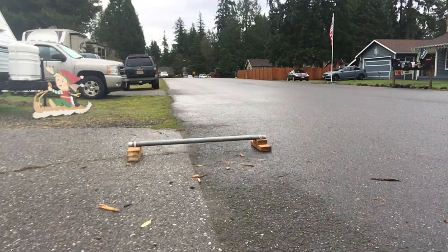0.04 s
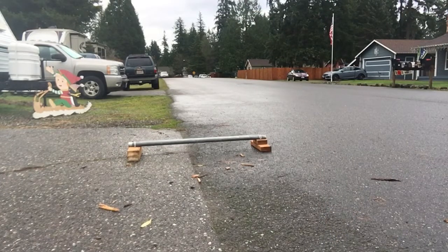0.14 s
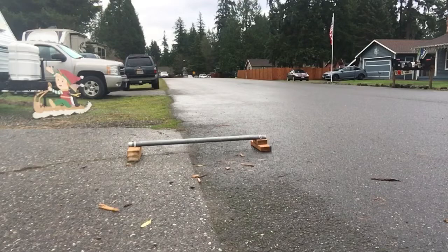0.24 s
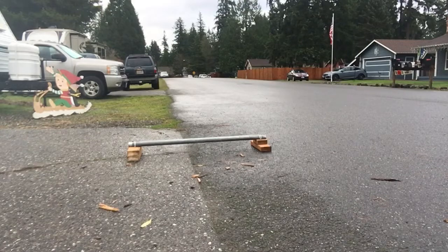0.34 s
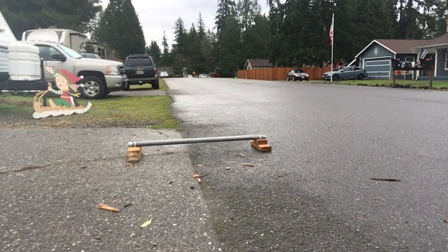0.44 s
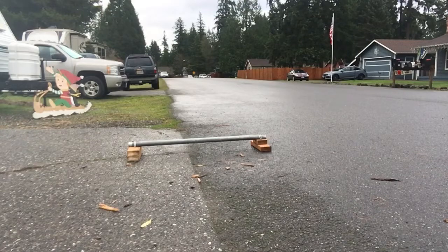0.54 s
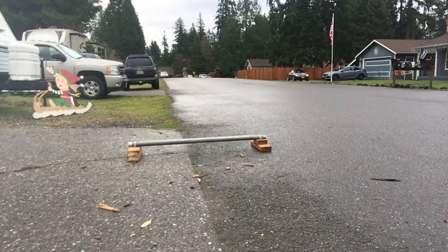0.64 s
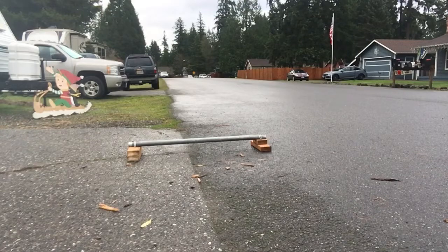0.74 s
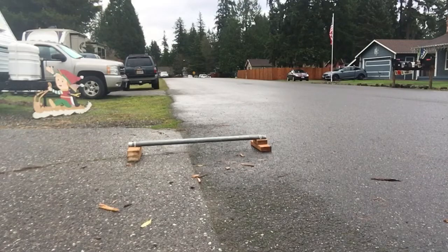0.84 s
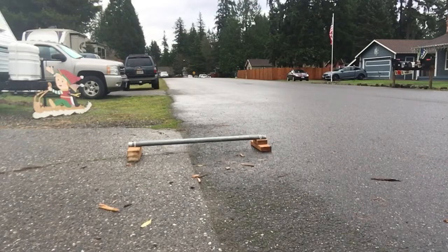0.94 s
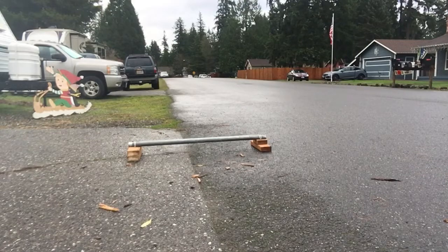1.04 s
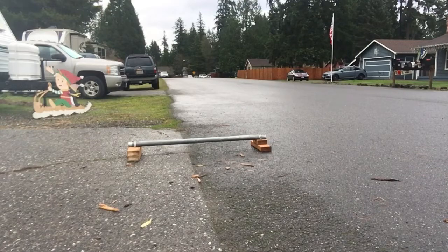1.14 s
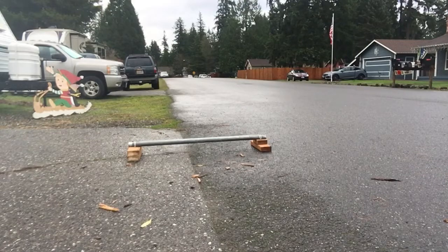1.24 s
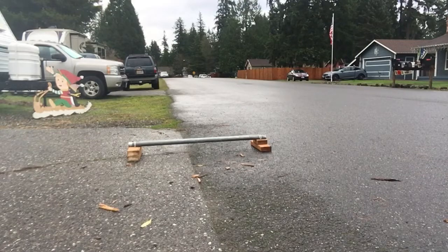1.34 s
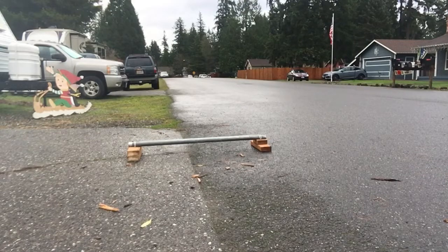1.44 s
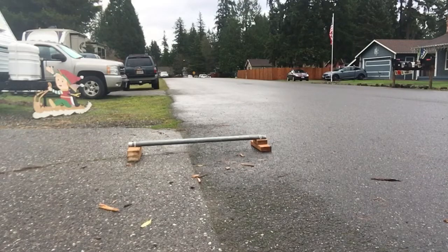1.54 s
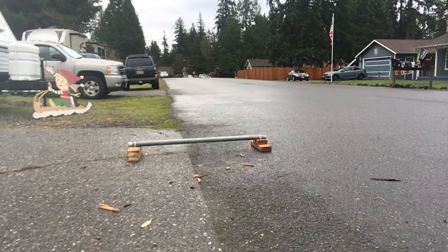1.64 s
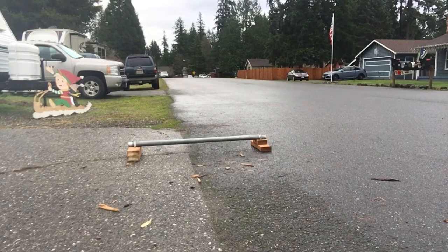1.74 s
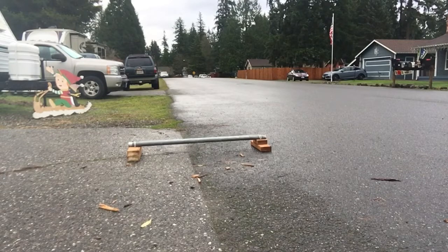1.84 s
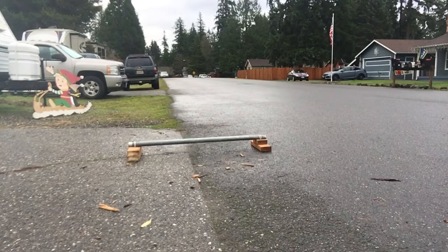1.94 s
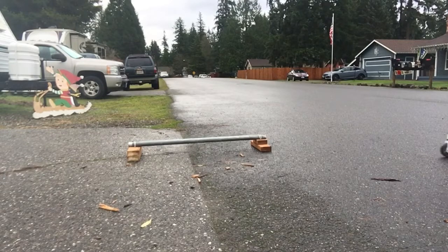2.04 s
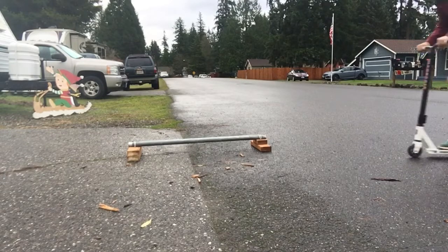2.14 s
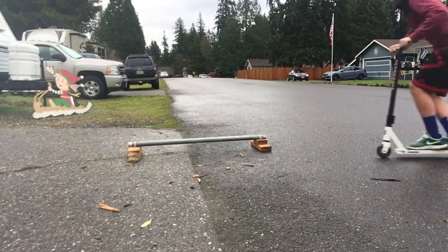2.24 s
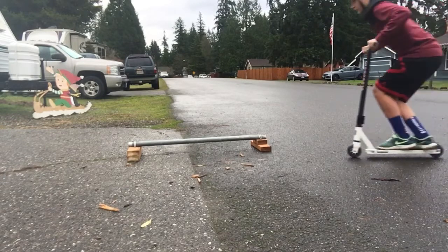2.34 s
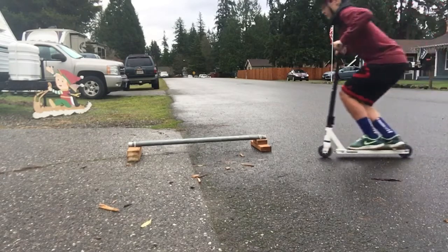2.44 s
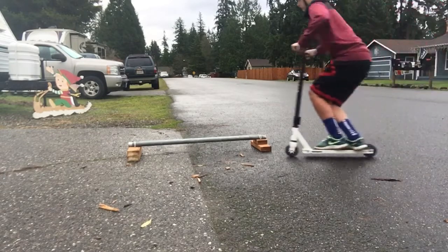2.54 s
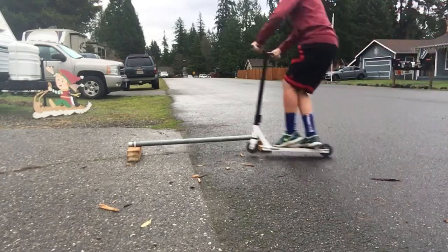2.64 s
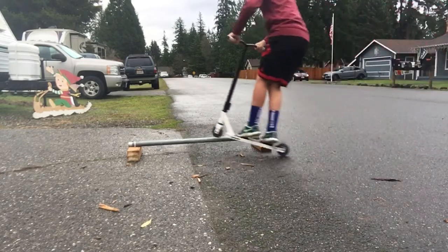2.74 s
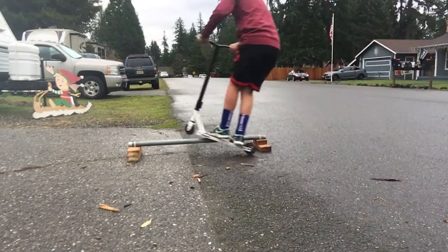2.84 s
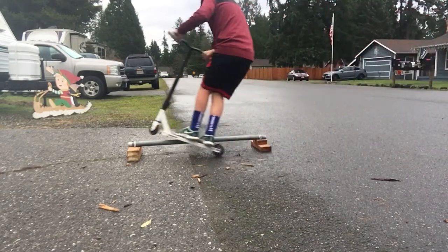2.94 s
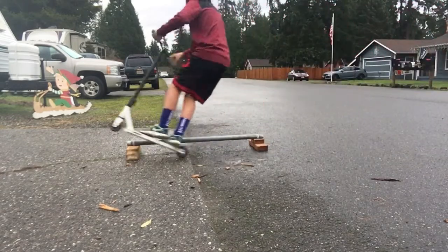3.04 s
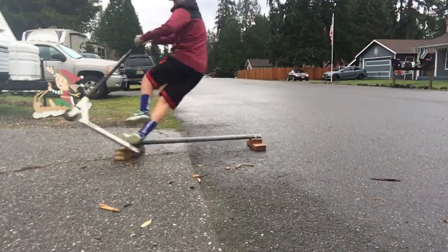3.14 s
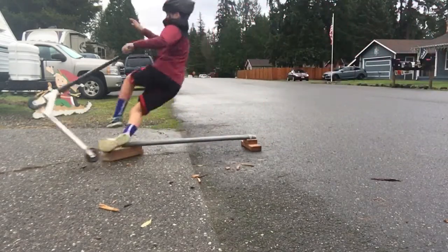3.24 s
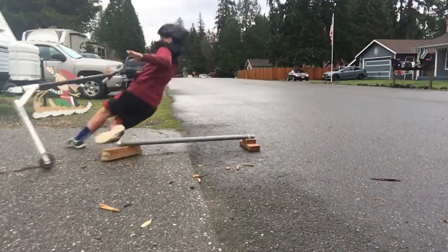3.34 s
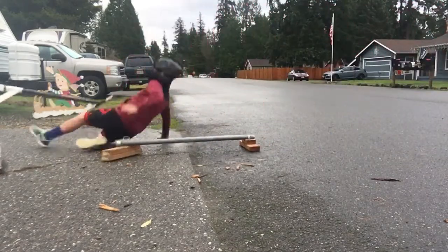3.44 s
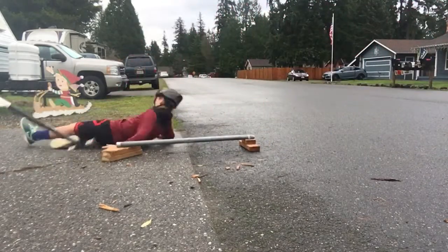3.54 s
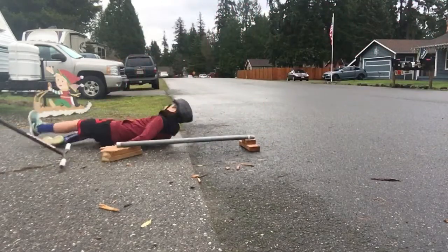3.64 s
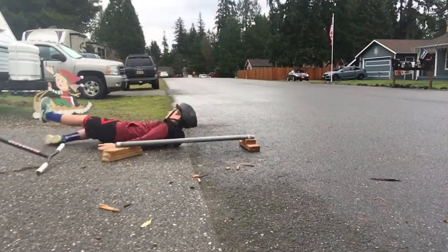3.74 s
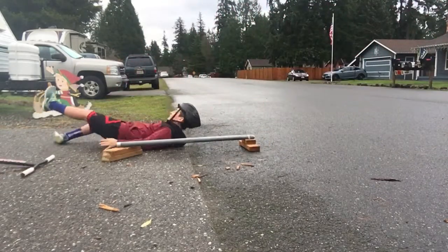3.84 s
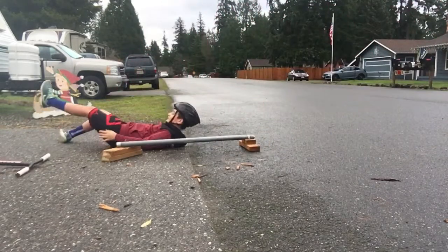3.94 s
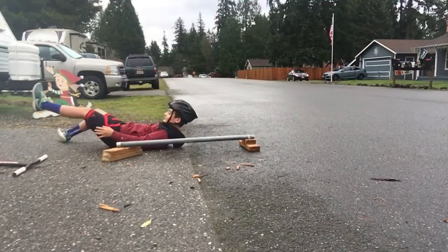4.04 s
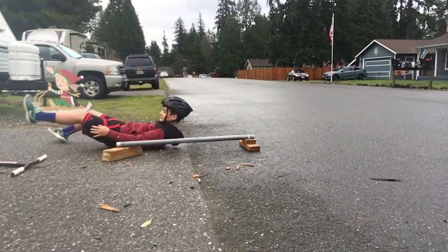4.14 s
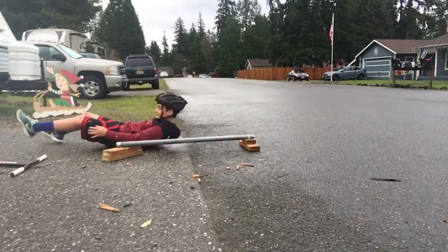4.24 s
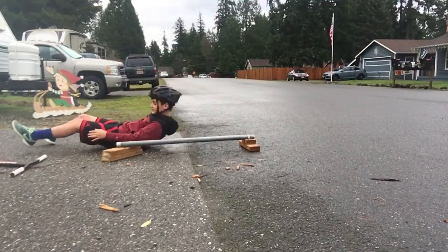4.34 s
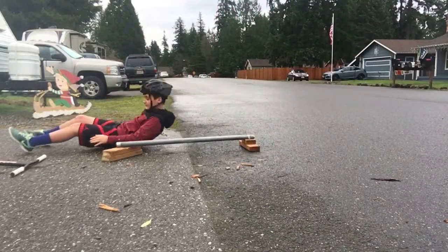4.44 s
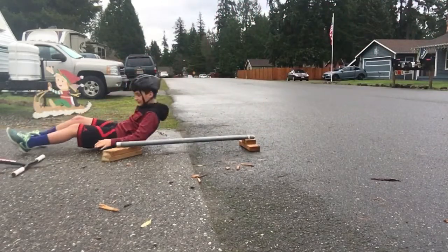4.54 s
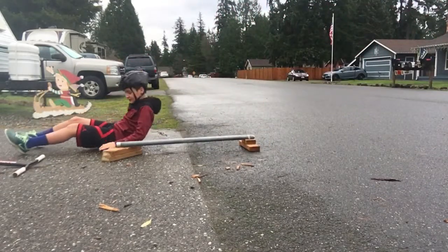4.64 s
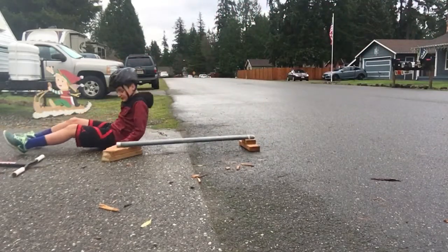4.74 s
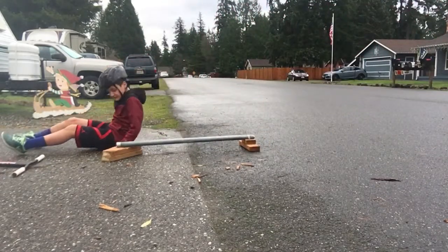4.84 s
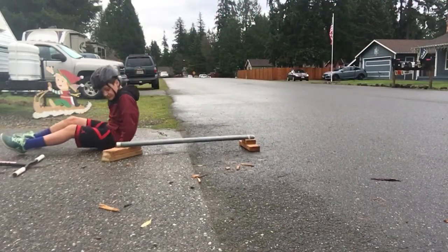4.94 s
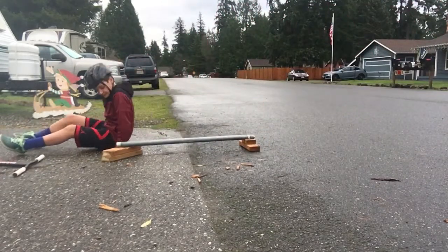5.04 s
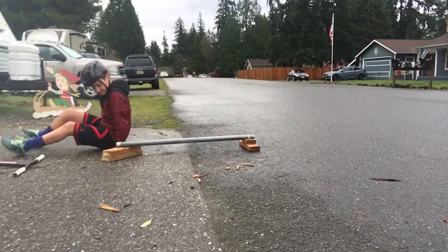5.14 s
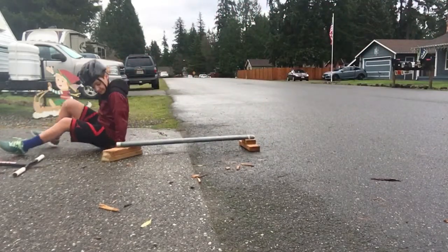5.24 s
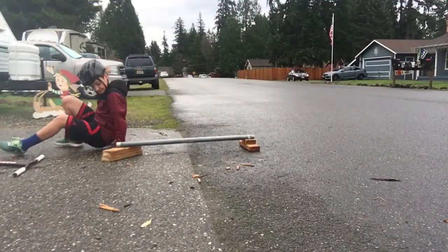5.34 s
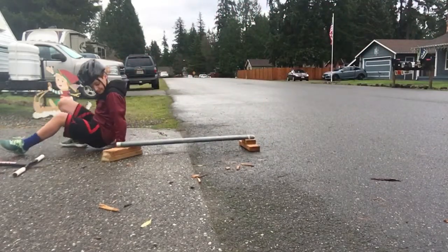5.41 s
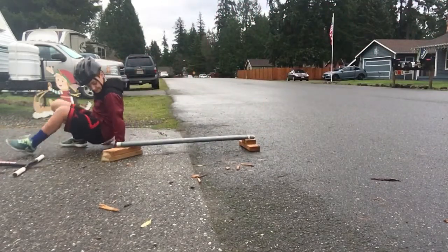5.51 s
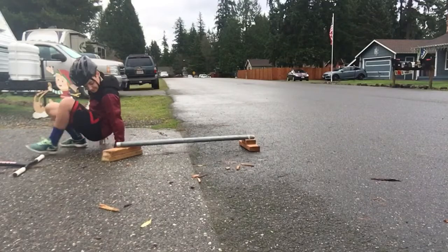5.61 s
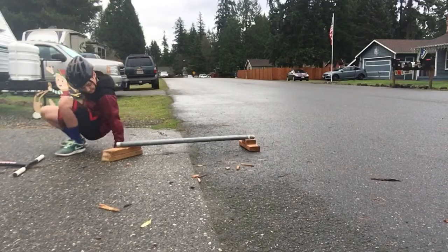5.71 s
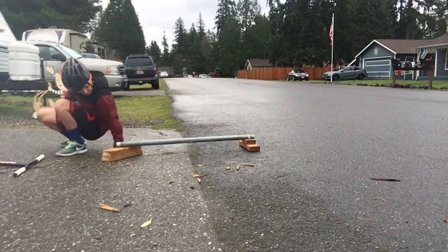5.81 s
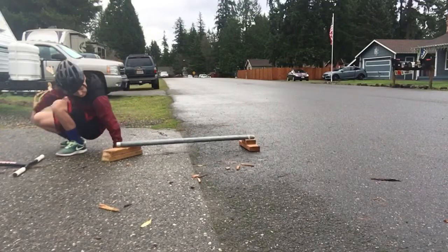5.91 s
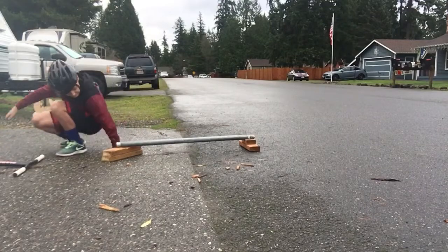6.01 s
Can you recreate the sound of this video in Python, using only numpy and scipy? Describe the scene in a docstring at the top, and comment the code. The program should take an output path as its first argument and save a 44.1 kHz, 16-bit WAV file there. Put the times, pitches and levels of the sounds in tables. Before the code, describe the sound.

A kick scooter rolls up a damp street, knocks and scrapes a steel pipe, then crashes and clatters over asphalt as its rider thuds down.

```python
"""Over distant traffic and far birds, a kick scooter rolls up a damp residential street and nears the microphone:
grainy wheel noise, filtered spray, small scuffs and one squeak. It hops onto a low steel pipe on wooden blocks,
where bursts of noise and decaying modes knock and ring, and rough noise scrapes. It slips off, the rider tumbles
in soft thuds, and the scooter cartwheels over the asphalt with its frame ringing and loose parts rattling. Cloth
and shoes scuff as the rider gets up. House fronts return smeared echoes of all the near sounds."""
import sys
import numpy as np
from scipy import signal
from scipy.fft import rfft, irfft
from scipy.io import wavfile
from scipy.ndimage import uniform_filter1d

SR = 44100
rng = np.random.default_rng(int(sys.argv[2]) if len(sys.argv) > 2 else 0)


def inscribe(sig):
    """Save sig as 16-bit PCM at rate SR to the path in sys.argv[1].

    A 1-D sig is mono; a 2-D sig holds one channel per row.
    Samples are clipped to [-1, 1] before scaling.
    """
    pcm = np.round(np.clip(np.atleast_2d(sig).T, -1, 1) * 32767)
    wavfile.write(sys.argv[1], SR, pcm.astype(np.int16))


N = 267687
T = np.arange(N) / SR
HIT_T = T[:int(.6 * SR)]

# Levels are relative dB wherever a function adds its own gain.
# Distant traffic, relative spectrum: pitch_hz, level_db
TRAFFIC_COLOUR = [(15, -67), (25, -26), (42, -14.5), (53, 5), (87, -6.5), (200, -3.5), (263, -3), (335, -6),
                  (503, -11.5), (641, -7), (1070, -9.5), (2220, -29), (3920, -39.5), (5000, -40.5),
                  (16000, -58)]
# Distant engines droning: pitch_hz, width_hz, level_db
DRONES = [(61.4, 5.7, -63), (197, 360, -67), (328, 4.2, -64.5)]
# Wheels on the road and flicked-up spray, relative spectra: pitch_hz, level_db
ROAD_COLOUR = [(50, -16.0), (200, 10.5), (400, 0.0), (680, -5.5), (900, -3.0), (1150, -16.5), (1600, -7.0),
               (4000, -41.5)]
SPRAY_COLOUR = [(600, -18.5), (2000, 3.5), (4000, 0.5), (7000, -7.0), (10000, -12.0), (15000, -7.5)]
# House fronts and parked cars: delay_s, level_db
WALLS = [(0.037, -16), (.088, -25.5), (.106, -25), (.14, -34.5), (.198, -33.5)]
# Tint of the street echo: pitch_hz, level_db
ECHO_COLOUR = [(80, -16), (250, 1), (600, 0.5), (1200, -5.5), (1900, 0), (2300, -4.5), (4000, 0.5),
               (8000, -14), (16000, -15)]
# Far birds, one slurred note each: start_s, start_pitch_hz, end_pitch_hz, level_db
BIRD_CALLS = [(.43, 3540, 4800, -71.5), (.625, 6000, 5140, -80), (.68, 4500, 3240, -76),
              (1.03, 3700, 4740, -75), (1.2, 3800, 5200, -80), (1.29, 4400, 4180, -79),
              (1.4, 3420, 4300, -78), (1.505, 3480, 4420, -74), (1.965, 4640, 3630, -73),
              (5.859, 4080, 3500, -78.5)]
# Small birds twittering in the trees: start_s, end_s, centre_hz, level_db
TWITTERS = [(0, .55, 6960, -82.5), (0, 0.398, 4600, -88), (0.803, 0.883, 7600, -83),
            (0.997, 1.601, 5220, -85), (5.75, 5.98, 5220, -87)]
# Soles, wet tyres and handlebar scuffing the asphalt: start_s, rise_s, level_db, centre_hz
SCUFFS = [(0.882, 0.0091, -54.5, 3000), (1.574, 0.0048, -54, 2880), (3.041, 0.011, -42, 9930),
          (3.176, 0.0049, -50.5, 4480), (3.236, 0.019, -48, 13000), (3.353, 0.0036, -34.5, 4650),
          (3.423, 0.018, -42.5, 2900), (4.334, 0.0055, -42, 1000), (4.447, 0.0068, -41.5, 2900),
          (4.556, 0.0068, -45, 1210), (4.83, 0.011, -43, 1290), (5.265, 0.01, -55, 3210),
          (5.494, 0.0046, -48.5, 3300), (5.542, 0.0028, -48.5, 2500), (5.61, 0.0087, -49, 2500)]
# Stones cracking under wheels, deck and shoes: start_s, level_db, hardness_db (treble tilt), pitch_hz
GRIT = [(1.657, -57, 27, 8000), (1.771, -54, 22, 9000), (1.9524, -43.5, 17, 3800),
        (2.047, -47.5, 23.5, 7000), (2.487, -52, 14, 1500), (2.9624, -18.5, 13.5, 8960),
        (3.274, -17.5, 0.5, 5000), (3.3262, -24.5, 1, 3000), (3.342, -28, 7, 6500),
        (3.363, -11, -0.5, 2400), (3.374, -30.5, -1, 2400), (3.437, -15, 3, 3000), (3.451, -28, 6, 4000),
        (5.489, -41, 3.5, 4000), (5.5177, -40, -5, 4200)]
# Deck and wheels striking the pipe, and once (3.325 s) a knock on its wooden blocks: start_s, level_db, bass_db
# and treble_db against the level, resonance_hz, # chatter_t60_s, rebound_db and ring_db against the level,
# favoured_hz (modes the contact point favours)
PIPE_HITS = [(2.7525, -10, -37.5, -9.5, 1404, 0.05, -2, -29.5, 7200),
             (2.8645, -19.5, -13.5, -10.5, 900, 0.053, -5.5, -30, 1030),
             (2.941, -31, -12, -7.5, 705, .05, -5.5, -35, 541),
             (3.201, -23.5, -28, -5.5, 1800, .05, -6.5, -27, 2395),
             (3.238, -24, -2.5, -9.5, 1400, 0.083, -2.5, -26.5, 7200),
             (3.2625, -23.5, -13.5, -13, 1320, .035, -8.5, -29, 1265),
             (3.325, -22, -8.5, -17, 560, 0.037, -4.5, -32, 541),
             (3.392, -31.5, -5, -12.5, 900, 0.036, -6, -28.5, 7200),
             (3.418, -29.5, -14.5, -10, 1400, 0.14, -2.5, -31.5, 1265)]
# The scooter striking the ground: same columns
FRAME_HITS = [(3.018, -26, -3.5, -6.5, 500, .06, -14.5, -33.5, 551),
              (3.0224, -17.5, -3, -2.5, 542, 0.11, -16, -34, 550),
              (3.4707, -17.5, -9.5, -3.5, 830, 0.073, -6, -25.5, 547),
              (3.4756, -14.5, -13.5, -7.5, 800, .12, -3, -26.5, 678),
              (3.491, -9, -9, -0.5, 1650, 0.1, -11.5, -23.5, 6750),
              (3.502, -15.5, 0, -14, 584, 0.13, -4, -20, 330),
              (3.627, -30, -7, -22, 700, .05, -12, -29, 1535),
              (3.663, -33.5, -15.5, -8, 1250, .04, -7, -25, 1230),
              (3.686, -31, -10, -17, 950, .04, -9, -25, 678),
              (3.711, -28, -16, -15, 1240, .03, -7, -26.5, 1243),
              (3.725, -20.5, -4, -2, 1114, 0.14, -7.5, -24, 1243),
              (3.7645, -20.5, -24, -27, 1100, 0.026, -14.5, -36, 1075),
              (3.7729, -3.5, -20, -6, 1490, 0.076, -11, -50, 1720),
              (3.877, -20.5, -11, -19, 920, 0.043, -6, -30, 1980),
              (3.912, -27, -9, -16, 1900, 0.05, -5, -28, 2728),
              (3.933, -28, -9, -24, 890, .04, -10.5, -27, 942),
              (3.972, -29.5, -12, -27, 1100, 0.056, -8.5, -23.5, 1920),
              (4.089, -37.5, -12, -17, 1013, 0.045, -7, -25.5, 1965),
              (4.3415, -9, -10, -12, 1200, 0.15, -7, -38, 1243),
              (4.3671, -5, -9, -7.5, 1160, 0.11, -16.5, -33, 1340),
              (4.452, -25, -11, -7, 1410, 0.1, -7, -26, 1480),
              (4.485, -28, -7.5, -22, 520, 0.083, -13, -20, 1260),
              (4.569, -5.5, -18.5, -17, 1060, .035, -10, -33.5, 2660),
              (4.5908, -11.5, -22, -11.5, 1370, 0.13, -7.5, -36, 1690),
              (4.69, -29.5, -3.5, -35, 477, 0.031, -9, -26, 445),
              (4.773, -24.5, -24.5, -14.5, 1590, 0.11, -0.5, -26, 1900),
              (4.8415, -13.5, -11.5, -4, 1180, 0.068, -11, -29.5, 2440),
              (4.854, -21.5, -18, -15, 3480, 0.097, -9, -24.5, 3460),
              (4.886, -23, -14, -19, 1710, 0.087, -2, -29, 1880),
              (4.905, -21.5, -6, -12, 1120, 0.1, -10, -26.5, 2728),
              (4.929, -24, -13, -16, 1790, 0.073, -4, -37, 1720),
              (5.158, -37, -4.5, -15, 1240, 0.064, -4.5, -36.5, 1970),
              (5.19, -24.5, -8.5, -17, 1560, 0.12, -3, -28.5, 2780),
              (5.213, -34, -13.5, -6.5, 1690, 0.037, -10, -34, 1865)]
# Resonances of the steel pipe, then of the scooter frame: pitch_hz, level_db, t60_s
PIPE_MODES = [(541, 2, .15), (705, -1, .22), (1030, 0, .08), (1265, -4, .25), (1687, -5, .12),
              (2603, 6.5, .41), (2628, 0, .3), (2700, -1, .16), (3087, -6, .25), (3278, -11, .3),
              (3625, -9, .3), (4065, -10, .22), (4897, -15, .35), (6375, -15, .36), (7170, -7, .3),
              (7295, -11, .2), (7520, -14, .15), (8042, -19, .22), (10040, -23, .22), (13750, -19, .2)]
FRAME_MODES = [(247, -2, .2), (330, -3, .35), (445, -5, .25), (550, -3, .25), (678, -1, .33), (942, 0, .3),
               (1075, -1, .25), (1243, 0, .33), (1420, -3, .25), (1535, 0, .38), (1705, -2, .28),
               (1880, -5, .27), (1965, -7, .3), (2435, -12, .48), (2728, -5.5, .33), (2933, -12, .26),
               (3250, -13, .22), (3465, -8, .22), (3893, -12, .32), (3985, -13, .25), (4450, -17, .22),
               (5370, -19, .25), (5830, -19, .25), (6090, -17, .17), (6650, -15, .28), (7050, -16, .3)]
# Tint of the pipe knocks, frame knocks, and slides and stones: pitch_hz, level_db
PIPE_COLOUR = [(47, -46), (80, -13), (331, -9.5), (515, -4), (1430, -5.5), (1990, -16), (2840, -10.5),
               (3790, -14), (4140, -9), (4420, -18.5), (7360, -19.5), (10500, -40), (16000, -51.5)]
FRAME_COLOUR = [(35, -50.5), (60, -6), (233, -1), (389, -0.5), (732, -2), (946, 3.5), (1580, -2),
                (2000, -2), (2190, -9.5), (2970, -8.5), (4860, -16.5), (6900, -21.5), (10300, -42),
                (12700, -38), (16000, -50.5)]
SLIDE_COLOUR = [(35, -40.5), (60, -19.5), (91, -12), (198, -4), (389, -4.5), (515, -3.5), (1200, 0),
                (1620, -4.5), (2970, -13.5), (6430, -21.5), (8510, -29.5), (13300, -36.5), (16000, -36)]
# Bass, middle, treble and sizzle of a blow: low_hz, high_hz
BLOW_BANDS = [(40, 500), (500, 2500), (2500, 8000), (8000, 17000)]
# The deck grinding along the pipe: start_s, length_s, level_db, rumble_db and hiss_db against the level, bite_db
GRINDS = [(2.76, .06, -46.5, 4.5, 6, -3), (3.202, .03, -49.5, -5.5, 3.2, 2.5),
          (3.27, .02, -40.5, -7.5, 2.4, 8.5)]
# The scooter skidding on the asphalt: same columns
SKIDS = [(2.945, 0.042, -46.5, 4, -3.5, -4.5), (3.024, 0.047, -46.5, -6, 6, -3),
         (3.32, 0.22, -42, -4, 0, -14), (3.49, 0.28, -37, -7, -9, 15.5), (3.774, 0.18, -35.5, -8, -7.5, 11),
         (4.41, 0.17, -38, -14, -12, -10)]
# The rider's feet and body landing: start_s, level_db, resonance_hz
THUMPS = [(2.818, -30, 159), (2.945, -27.5, 210), (2.975, -27.5, 154), (3.025, -18, 175),
          (3.052, -24.5, 245), (3.122, -36.5, 160), (3.219, -27.5, 190.7), (3.2621, -18.5, 165),
          (3.326, -22.5, 230), (3.387, -24, 190), (3.429, -25, 258.4), (3.494, -20.5, 149.8),
          (3.774, -9.5, 254), (4.345, -28.5, 140), (4.367, -25, 270), (4.572, -21.5, 280)]
# Tint of those landings: pitch_hz, level_db
BODY_COLOUR = [(25, -19), (45, -5.5), (90, -3.5), (150, -0.5), (260, 2), (450, -11), (1200, 0), (3000, -27),
               (8000, -32.5), (16000, -46.5)]
# Jacket and shoes dragging as the rider rolls over and gets up, after a spinning wheel's faint spray (the first
# row): middle_s, half_length_s, level_db
RUSTLES = [(4.243, 0.14, -58), (5.204, 0.057, -50.5), (5.499, 0.047, -49), (5.633, 0.028, -52)]
# Tint of those soft dragging strokes: pitch_hz, level_db
CLOTH_COLOUR = [(200, -5.0), (900, 16.5), (3000, -6.0), (7000, -9.5), (10000, -22.0), (15000, -17)]

TRAFFIC_DB, TRAFFIC_FLICKER_DB = -50.5, 1.1
# the run-up: the scooter nears at a steady speed, is pressed down in a crouch, then leaves the ground
SPEED_M_S, NEAREST_M, TAKEOFF_S, LIFT_S = 2.97, 3.13, 2.75, .03
CROUCH_S, CROUCH_WIDTH_S, CROUCH_RUMBLE_DB, CROUCH_SPRAY_DB = 2.485, 0.074, 9, 8
RUMBLE_DB, SPRAY_DB, SPRAY_FLICKER_DB = -52.5, -66, 2.5
DECK_HUM_HZ, DECK_HUM_DB = 870, -51.5
BIRD_NOTE_S = 0.067
TWITTER_NOTE_S, TWITTER_GAP_S, TWITTER_OCTAVES = .04, .04, .13
SQUEAK_S, SQUEAK_LENGTH_S, SQUEAK_START_HZ, SQUEAK_END_HZ = 1.576, .0125, 1530, 3400
SQUEAK_DB, SQUEAK_DB_PER_OCTAVE = -46.5, -10
GRIT_T60_S, GRIT_BASS_DB, GRIT_SIZZLE_DB = 0.014, -16, -25
# BLOW_S sets the loudness of a blow and how soon the next contact damps a ring
BLOW_S = .01
# the first contact of a blow: its t60 and, for a full-scale blow, its height over the chatter
FIRST_CONTACT_S, PUNCH = .022, 2.2
# every blow has a sharper rebound: delay_s, added treble_db
PIPE_REBOUND = (.003, 0.96)
FRAME_REBOUND = (.012, 3)
# how sharply a tube still in contact resonates, and the width that the contact adds
SHELL_Q, SHELL_WIDTH_HZ = 72, 24
FAVOUR_OCTAVES, RING_FLUTTER_DB, CLEAN_T60_S = .2, 2.5, .5
# a slide bites as the weight comes down, sags as it slows (the hiss sooner) and dies away when contact ends
SLIDE_ATTACK_S, BITE_S, SLIDE_RELEASE_T60_S = 0.0056, 0.017, 0.29
SAG_DB_PER_S, HISS_SAG_DB_PER_S = 2.5, 43
# the resonances of a scrape change as the contact point shifts
SHIFT_PER_S, SHIFT_DB = 28, 6
THUMP_T60_S, SLAP_DB = 0.14, -3.5
# loose parts take up a share of every blow on the ground and rattle it away
RATTLE_DB, RATTLE_RISE_S, RATTLE_T60_S = -32, 0.017, 0.39
TOP_HZ = 16000


def undb(db):
    """Decibels to gain."""
    return 10 ** (np.asarray(db) / 20)


def unit(x):
    """Scale to rms 1."""
    return x / np.sqrt(np.mean(x ** 2))


def band(x, lo_hz, hi_hz):
    """Band-pass."""
    edges = [lo_hz, min(hi_hz, .48 * SR)]
    return signal.sosfilt(signal.butter(N=3, Wn=edges, btype="band", fs=SR, output="sos"), x)


def colour(x, points, size=2048):
    """Causal minimum-phase filter that follows a spectrum of (Hz, dB) points."""
    hz, db = np.transpose(points)
    bins_hz = np.fft.rfftfreq(size, 1 / SR)
    gain = undb(np.interp(np.log(bins_hz + 1), np.log(hz), db))
    # folding the cepstrum forward puts the energy at the start
    cepstrum = irfft(np.log(gain))
    cepstrum[1:size // 2] *= 2
    cepstrum[size // 2 + 1:] = 0
    return signal.fftconvolve(x, irfft(np.exp(rfft(cepstrum))))[:len(x)]


def fade(t, t60):
    """Exponential decay, 60 dB down at t60."""
    return np.exp(-np.log(1000) * t / max(t60, 1e-3))


def since(s):
    """Seconds gone by since time s, zero before it."""
    return np.maximum(T - s, 0)


def swell(s, width_s):
    """A smooth rise and fall that reaches 1 at time s."""
    return np.exp(-((T - s) / width_s) ** 2)


def walk(rate):
    """Smoothed random wander over the whole scene, rms 1."""
    k = int(SR / rate)
    steps = np.repeat(rng.standard_normal(N // k + 1), k)
    return unit(uniform_filter1d(steps, k)[:N])


def wander(n, rate):
    """Random values joined by straight lines, rate of them a second."""
    points = rng.standard_normal(int(n * rate / SR) + 2)
    return np.interp(np.arange(n) * rate / SR, np.arange(len(points)), points)


def grains(n, spread_db):
    """Dense micro-impacts; a wider spread lets single ones stand out."""
    size_db = spread_db * np.minimum(rng.exponential(size=n), 6)
    return unit(rng.standard_normal(n) * undb(size_db))


def resonate(x, hz, q):
    """One damped resonance, gain 1 at its centre."""
    return signal.lfilter(*signal.iirpeak(hz, max(q, 1), fs=SR), x)


def add(out, s, x):
    """Mix x into out at time s."""
    i = int(s * SR)
    out[i:i + len(x)] += x[:N - i]


def neighbourhood(flicker_db):
    """Distant traffic, noise that wavers band by band, and engines droning as narrow bands of noise."""
    edges = np.geomspace(20, 20000, num=11)
    air = 0
    for lo, hi in zip(edges, edges[1:]):
        air = air + band(rng.standard_normal(N), lo, hi) * undb(flicker_db * walk(7))
    out = undb(TRAFFIC_DB) * unit(colour(air, TRAFFIC_COLOUR)) * undb(0.27 * walk(2.5))
    for hz, width, db in DRONES:
        out += undb(db) * unit(band(rng.standard_normal(N), hz - width / 2, hz + width / 2))
    return out


def wheels():
    """Small hard wheels rumble on the rough asphalt, hum through the deck and flick up spray that carries less far."""
    # gain falls with distance from the microphone, 1 at takeoff
    nearness = NEAREST_M / np.hypot(NEAREST_M, SPEED_M_S * (T - TAKEOFF_S))
    contact = np.exp(-since(TAKEOFF_S) / LIFT_S)
    crouch = swell(CROUCH_S, CROUCH_WIDTH_S)
    rumble = nearness * undb(RUMBLE_DB + CROUCH_RUMBLE_DB * crouch)
    spray = nearness ** 2 * undb(SPRAY_DB + CROUCH_SPRAY_DB * crouch)
    road = colour(grains(N, spread_db=3.5), ROAD_COLOUR)
    drops = colour(grains(N, spread_db=5.0) * undb(SPRAY_FLICKER_DB * walk(98)), SPRAY_COLOUR)
    hum = undb(DECK_HUM_DB) * crouch * unit(resonate(road, DECK_HUM_HZ, q=14))
    return contact * (rumble * unit(road) + hum + spray * unit(drops))


def street(x, tail_db, t60_low, t60_high):
    """Rough house fronts send back smeared echoes; trees add a thin, dull tail."""
    t = T[:2 * SR]
    noise = rng.standard_normal(len(t))
    tail = band(noise, 60, 2200) * fade(t, t60_low) + band(noise, 4100, 24000) * fade(t, t60_high)
    tail *= 1 - np.exp(-t / 0.014)
    response = undb(tail_db) * tail / np.linalg.norm(tail)
    for delay, db in WALLS:
        smear = rng.standard_normal(len(HIT_T)) * fade(HIT_T, 0.053)
        add(response, delay, undb(db) * smear / np.linalg.norm(smear))
    return signal.fftconvolve(x, colour(response, ECHO_COLOUR))[:N]


def note(length_s, start_hz, end_hz):
    """One slurred, warbling bird note: a gliding sine with a smooth rise and fall."""
    n = int(length_s * SR)
    pitch = np.linspace(start_hz, end_hz, n) * (1 + .06 * wander(n, rate=900))
    return 2 * np.hanning(n) * np.sin(2 * np.pi * np.cumsum(pitch) / SR)


def birds(echo_db):
    """Single calls and quick runs of short notes, smeared by the trees."""
    out = np.zeros(N)
    for s, start_hz, end_hz, db in BIRD_CALLS:
        add(out, s, undb(db) * note(BIRD_NOTE_S, start_hz, end_hz))
    for start, end, hz, db in TWITTERS:
        for s in np.arange(start, end, TWITTER_GAP_S):
            start_hz, end_hz = hz * 2 ** (TWITTER_OCTAVES * rng.standard_normal(2))
            late_s = TWITTER_GAP_S * rng.random()
            add(out, s + late_s, undb(db) * note(TWITTER_NOTE_S, start_hz, end_hz))
    trees = rng.standard_normal(len(HIT_T)) * fade(HIT_T, 0.61)
    return out + undb(echo_db) * signal.fftconvolve(out, trees / np.linalg.norm(trees))[:N]


def scuffs(focus_db):
    """Short gritty rubs that bite quickly and trail off, focused in one broad resonance."""
    out = np.zeros(N)
    for s, rise, db, hz in SCUFFS:
        hump = [(hz / 5, -22), (hz / 2, -7), (hz, 0), (hz * 2, -8), (hz * 4, -20)]
        rub = colour(grains(len(HIT_T), spread_db=5.0), hump)
        rub += undb(focus_db) * resonate(rub, hz, q=1.5)
        stroke = HIT_T / rise * np.exp(1 - HIT_T / rise)
        add(out, s, undb(db) * unit(rub) * stroke)
    return out


def squeak():
    """A tiny, rough chirp, like wet rubber slipping: its pitch curls upward and it stops short."""
    u = np.linspace(0, 1, int(SQUEAK_LENGTH_S * SR))
    glide = SQUEAK_START_HZ + (SQUEAK_END_HZ - SQUEAK_START_HZ) * u ** 3
    pitch = glide * (1 + .09 * wander(len(u), rate=2500))
    phase = 2 * np.pi * np.cumsum(pitch) / SR
    tone = sum(undb(SQUEAK_DB_PER_OCTAVE * np.log2(k)) * np.sin(k * phase) for k in range(1, 6))
    tone = tone * undb(3 * wander(len(u), rate=1500))
    out = np.zeros(N)
    add(out, SQUEAK_S, undb(SQUEAK_DB) * unit(tone) * signal.windows.tukey(len(u), .35))
    return out


def blow(points, band_db, t60, snap, bass_hold, body_hz=1000, body_db=-60, q=8, punch=0):
    """A brief hard contact, then the chatter of loose parts; the contact point favours one resonance."""
    chatter = grains(len(HIT_T), spread_db=3.0)
    out = 0
    for k, (lo, hi) in enumerate(BLOW_BANDS):
        hold = bass_hold if k == 0 else 1
        force = chatter * (fade(HIT_T, t60 * hold) + punch * fade(HIT_T, FIRST_CONTACT_S))
        force /= np.linalg.norm(force)
        force[0] += snap
        force += undb(body_db) * resonate(force, body_hz, q)
        part = band(colour(force, points), lo, hi)
        out = out + undb(band_db[k]) * part / np.linalg.norm(part)
    return out * np.sqrt(BLOW_S * SR)


def grit(gain_db, focus_db):
    """Single stones snap with no ring, each around its own pitch; the harder the stone, the brighter."""
    out = np.zeros(N)
    for s, db, tilt_db, hz in GRIT:
        band_db = [GRIT_BASS_DB, -tilt_db, 0, GRIT_SIZZLE_DB + tilt_db]
        crack = blow(SLIDE_COLOUR, band_db, GRIT_T60_S, snap=1.3, bass_hold=1.5,
                     body_hz=hz, body_db=focus_db, q=2.5)
        add(out, s, undb(db + gain_db) * crack)
    return out


def contact_q(hz):
    """Sharpness of a tube mode, broadened by contact."""
    return hz / (SHELL_WIDTH_HZ + hz / SHELL_Q)


def shell(x, modes, gain_db):
    """A tube lends its resonances to whatever shakes it; the energy stays the same."""
    y = x + undb(gain_db) * sum(resonate(x, hz, contact_q(hz)) for hz, _, _ in modes)
    return y * np.linalg.norm(x) / np.linalg.norm(y)


def ring(modes, scatter_db, bright_db=0, favoured_hz=1000, favour_db=0):
    """Ringing of a struck tube: the contact point favours some modes, and the longer-lived are the purer."""
    out = 0
    n = len(HIT_T)
    for hz, db, t60 in modes:
        blur = max(1 - (t60 / CLEAN_T60_S) ** 2, 0)
        size, detune, side = rng.standard_normal(3)
        pitch = hz * (1 + .002 * blur * detune) + .8 * blur * np.sqrt(hz) * wander(n, rate=300)
        treble_share = np.interp(hz, [1800, 3500], [0, 1])
        gain = undb(db + scatter_db * blur * size + bright_db * treble_share)
        favour = favour_db * np.exp(-(np.log2(hz / favoured_hz) / FAVOUR_OCTAVES) ** 2)
        gain = gain * undb(favour + RING_FLUTTER_DB * blur * wander(n, rate=150))
        tone = np.sin(2 * np.pi * np.cumsum(pitch) / SR)
        out = out + np.sign(side) * gain * fade(HIT_T, t60) * tone
    return out


def knocks(hits, rebound, points, modes, knock_db, snap, bass_hold, scatter_db,
           body_db, shell_db, sizzle_db, favour_db, damp_db):
    """Blows on a metal tube, each with its rebound: a hollow knock and a free ring that the next contact damps."""
    out = np.zeros(N)
    next_times = [hit[0] for hit in hits[1:]] + [T[-1]]
    for hit, next_s in zip(hits, next_times):
        s, level_db, bass_db, treble_db, hz, t60, rebound_db, ring_db, favoured_hz = hit
        for delay, sharper_db, drop_db in [(0, 0, 0), (*rebound, rebound_db)]:
            db = level_db + drop_db
            treble = treble_db + sharper_db
            band_db = [bass_db, 0, treble, treble + sizzle_db]
            # the harder the blow, the more of its energy goes into the first contact
            knock = blow(points, band_db, t60, snap, bass_hold, hz, body_db, q=2.5, punch=PUNCH * undb(db))
            add(out, s + delay, undb(db + knock_db) * shell(knock, modes, shell_db))
        # a dull blow barely wakes the high modes
        ringing = ring(modes, scatter_db, .5 * (treble_db + 12.0), favoured_hz, favour_db)
        touched = np.clip((s + HIT_T - next_s) / BLOW_S, 0, 1)
        add(out, s, undb(level_db + ring_db + damp_db * touched) * ringing)
    return out


def pipe_knocks():
    """Deck and wheels strike the steel pipe, once its wooden blocks, and set the pipe's modes ringing."""
    return knocks(PIPE_HITS, PIPE_REBOUND, PIPE_COLOUR, PIPE_MODES, knock_db=-8.0, snap=0.18, bass_hold=1.2,
                  scatter_db=5.0, body_db=9.5, shell_db=-6, sizzle_db=-16.5, favour_db=6, damp_db=-5)


def friction(slides):
    """Gains of rumble, body and hiss over a set of slides: attack, bite, sagging hold, release."""
    gains = np.zeros((3, N))
    for s, length, db, rumble_db, hiss_db, bite_db in slides:
        t = since(s)
        pressure = (1 - np.exp(-t / SLIDE_ATTACK_S)) * (1 + undb(bite_db) * np.exp(-t / BITE_S))
        release = fade(since(s + length), SLIDE_RELEASE_T60_S)
        body = undb(db - SAG_DB_PER_S * t) * pressure * release
        gains += [body * undb(rumble_db), body, body * undb(hiss_db - HISS_SAG_DB_PER_S * t)]
    return gains


def shifting(x, modes, gain_db):
    """A dragged tube: its resonances come and go as the contact point moves."""
    moving = 0
    for hz, _, _ in modes:
        moving = moving + resonate(x, hz, contact_q(hz)) * undb(SHIFT_DB * wander(N, rate=SHIFT_PER_S))
    return unit(x + undb(gain_db) * moving)


def slide(pipe_db, judder_db, frame_db):
    """Metal catches and slips over grit; while on the pipe it keeps the pipe singing."""
    on_pipe = friction(GRINDS)
    rumble, body, hiss = on_pipe + friction(SKIDS)
    rub = colour(grains(N, spread_db=3.0) * undb(judder_db * walk(110)), SLIDE_COLOUR)
    rub = shifting(rub, FRAME_MODES, frame_db)
    low = unit(band(rub, 80, 500))
    mid = unit(band(rub, 500, 2500))
    high = unit(band(rub, 2500, 16000))
    tube = ring(PIPE_MODES, scatter_db=2.5)
    drive = grains(N, spread_db=6.5) * on_pipe[-1]
    singing = signal.fftconvolve(drive, tube / np.linalg.norm(tube))[:N]
    return rumble * low + body * mid + hiss * high + undb(pipe_db) * singing


def rider(gain_db):
    """Feet and body land softly and heavily: low, broadly resonant blows."""
    out = np.zeros(N)
    for s, db, hz in THUMPS:
        band_db = [0, SLAP_DB, SLAP_DB - 8.5, SLAP_DB - 23.0]
        thud = blow(BODY_COLOUR, band_db, THUMP_T60_S, snap=0.64, bass_hold=0.72, body_hz=hz, body_db=5, q=0.78)
        add(out, s, undb(db + gain_db) * thud)
    return out


def frame_knocks():
    """The scooter strikes the ground and its frame rings."""
    return knocks(FRAME_HITS, FRAME_REBOUND, FRAME_COLOUR, FRAME_MODES, knock_db=-8.0, snap=0.3, bass_hold=0.5,
                  scatter_db=5.0, body_db=4.5, shell_db=-2.5, sizzle_db=-14.5, favour_db=13, damp_db=-8.0)


def rattle(judder_db, taps_per_s, rub_db):
    """Loose bearings and clamps, shaken by each blow on the ground, tap and rub inside the frame."""
    energy = 0
    for s, db, *_ in FRAME_HITS:
        t = since(s)
        shaking = undb(db + RATTLE_DB) * (1 - np.exp(-t / RATTLE_RISE_S)) * fade(t, RATTLE_T60_S)
        energy = energy + shaking ** 2
    taps = (rng.random(N) < taps_per_s / SR) * (2 * rng.random(N) - 1)
    chatter = unit(taps) + undb(rub_db) * grains(N, spread_db=6.0)
    chatter = chatter * undb(judder_db * walk(90))
    return np.sqrt(energy) * unit(shell(colour(chatter, FRAME_COLOUR), FRAME_MODES, gain_db=3))


def clothes(flutter_db):
    """Soft, uneven strokes: a spinning wheel's faint spray, then cloth dragging over gritty ground."""
    loudness = sum(undb(db) * swell(s, width_s) for s, width_s, db in RUSTLES)
    rub = grains(N, spread_db=3.0) * undb(flutter_db * walk(42))
    return loudness * unit(colour(rub, CLOTH_COLOUR))


def scene():
    """The run-up and the fall near the microphone, their echo, and the street around them."""
    near = wheels() + scuffs(focus_db=1.0) + squeak() + grit(gain_db=-14.5, focus_db=2)
    near += pipe_knocks() + slide(pipe_db=-9.5, judder_db=3.5, frame_db=-4.5) + rider(gain_db=-7.0)
    near += frame_knocks() + rattle(judder_db=3.0, taps_per_s=880, rub_db=-5.5) + clothes(flutter_db=1.5)
    echo = street(near, tail_db=-18.5, t60_low=0.74, t60_high=0.82)
    far = neighbourhood(flicker_db=TRAFFIC_FLICKER_DB) + birds(echo_db=-6)
    return (near + echo + far)[None]


def record(dry):
    """The microphone channel clips just under full scale and cuts the top."""
    clipped = np.clip(dry, -.88, .88)
    return signal.sosfilt(signal.ellip(8, .2, 70, TOP_HZ, fs=SR, output="sos"), clipped)


dry = scene()
out = record(dry)
inscribe(out)
```